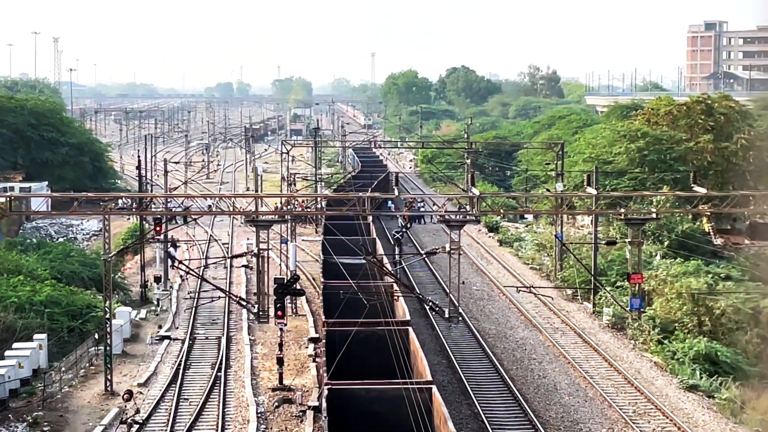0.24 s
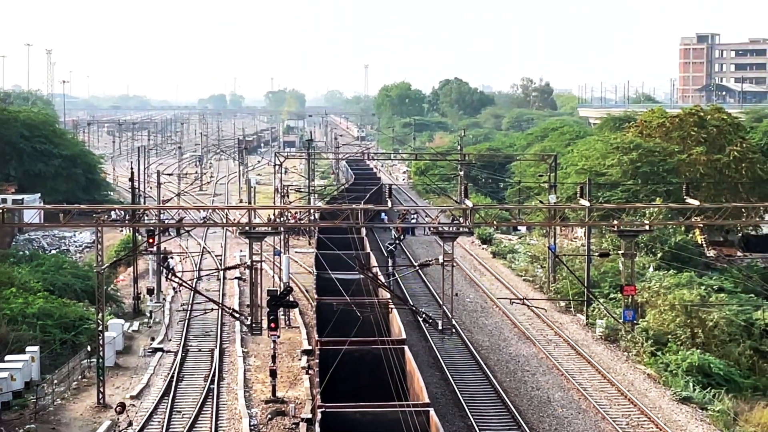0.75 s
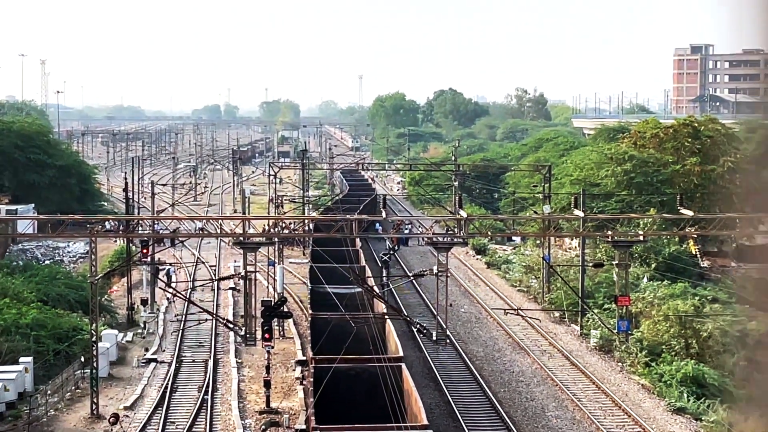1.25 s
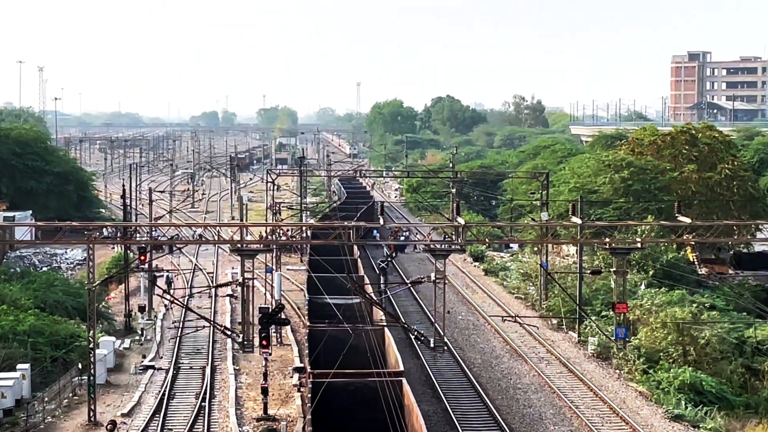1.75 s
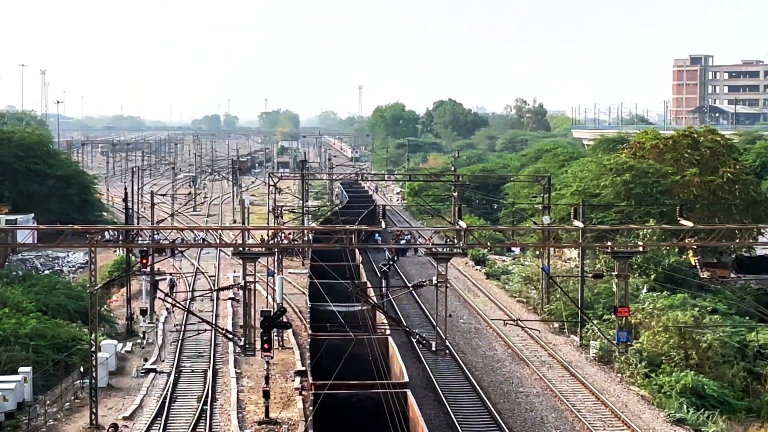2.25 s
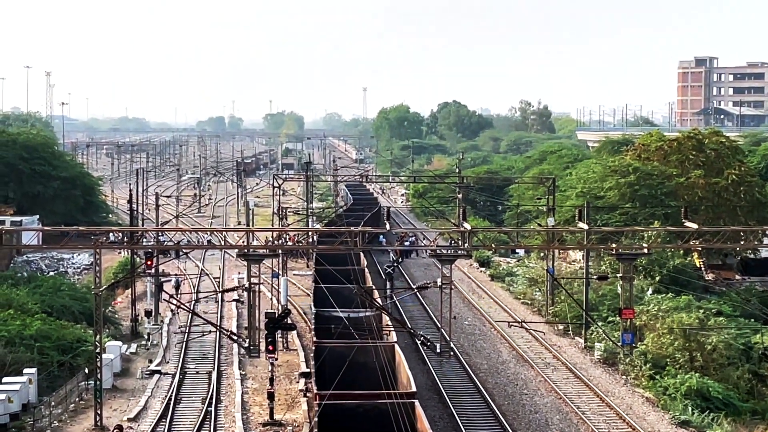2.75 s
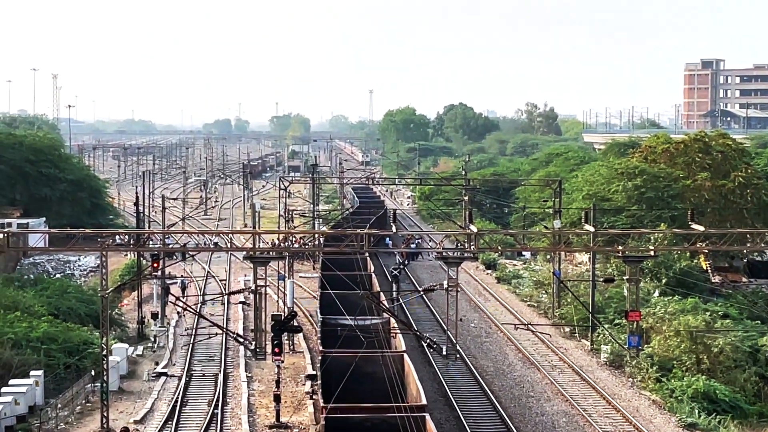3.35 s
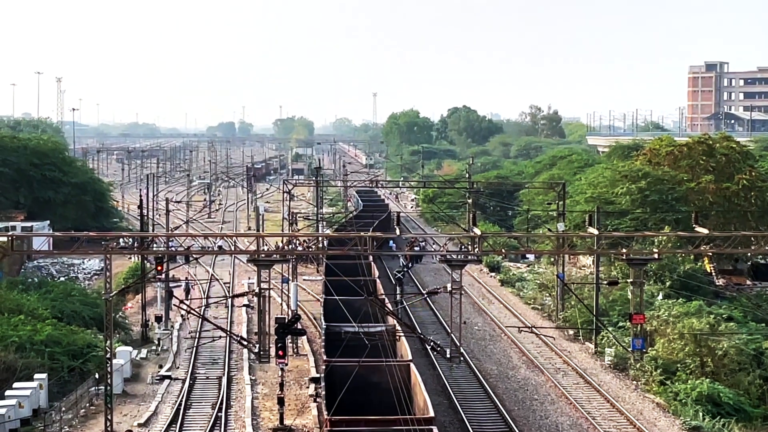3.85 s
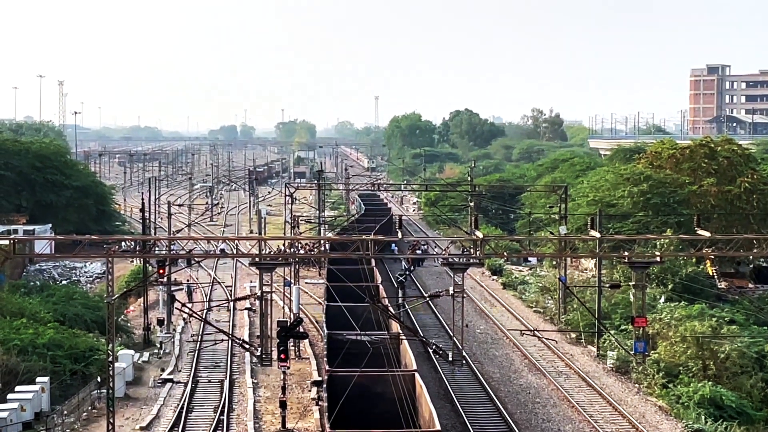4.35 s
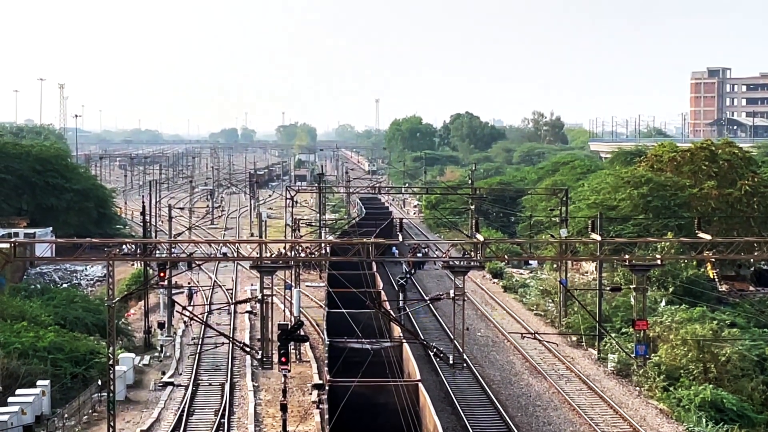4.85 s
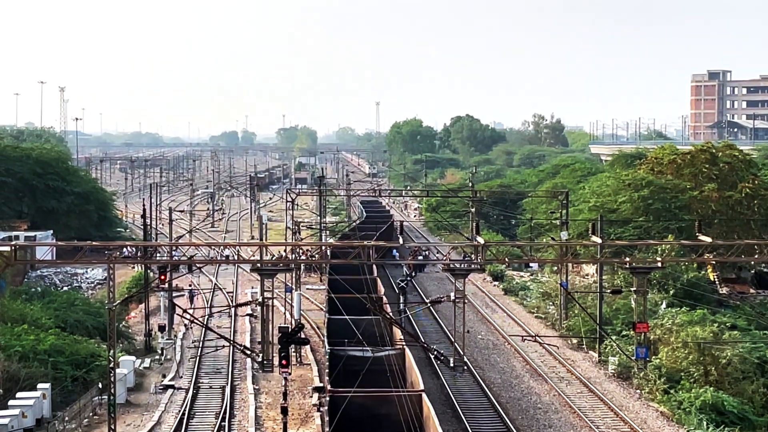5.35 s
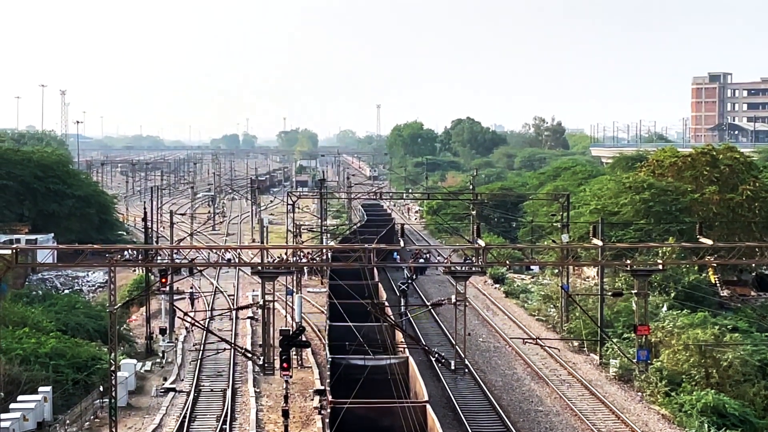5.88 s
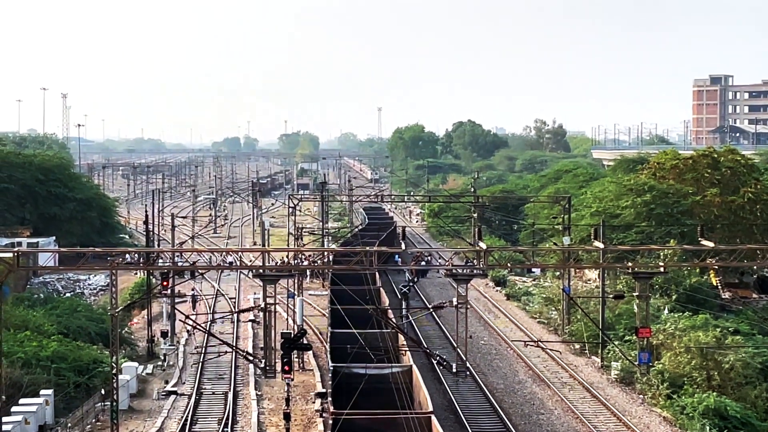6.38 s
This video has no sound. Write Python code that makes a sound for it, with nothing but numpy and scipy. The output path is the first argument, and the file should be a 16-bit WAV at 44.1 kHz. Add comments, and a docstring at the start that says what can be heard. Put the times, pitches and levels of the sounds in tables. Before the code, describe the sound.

Gusts thump and flutter against an exposed microphone, partly covering a freight train passing below. Metal wheels grind in uneven swells, with dull body thuds and short clanks. The hardest wind blast comes around two and a half seconds. Just after three, a far horn toots twice, quick and soft with a slight yard echo. Lighter wind follows, leaving clearer rolling, brief high squeaks, a sharp clank near the end and final low knocks.

```python
"""From the start a long train of open freight wagons rolls under a footbridge in a rail yard: shaped noise
makes its drone, roar and hiss, louder in each rub of wheel on rail; clanks, knocks and squeaks are short rings,
noise bursts and gliding tones. Gusty noise and falling chirps make wind rumble and pop on the microphone, hardest
in the first three seconds. Just after three seconds a distant horn, a stack of sine waves, toots twice.
Then the wind is weaker while the wheels go on grinding, squeaking and clanking to the end."""
import sys
import numpy as np
from scipy import signal
from scipy.fft import rfft, irfft
from scipy.io import wavfile
from scipy.ndimage import uniform_filter1d, minimum_filter1d

SR = 44100
rng = np.random.default_rng(int(sys.argv[2]) if len(sys.argv) > 2 else 0)


def store_pcm(level_fs):
    """Save levels as 16-bit WAV."""
    pcm = np.round(np.clip(level_fs, -1, 1) * 32767).astype(np.int16)
    wavfile.write(sys.argv[1], SR, np.atleast_2d(pcm).T)


N = 291942
TIME = np.arange(N) / SR
FREQS = np.fft.rfftfreq(N, 1 / SR)

# Pairs of signals are (mid, side): what left and right share, and half their difference.
# Levels in the tables are starting points; the *_db trims in the functions then shift whole layers.


def amp(db):
    """Turns decibels into a plain gain."""
    return 10 ** (np.asarray(db) / 20)


def unit(x):
    """Scales a sound to an average (rms) level of 1."""
    return x / np.sqrt(np.mean(x ** 2) + 1e-20)


def colour(points, hz, rolloff_db=18):
    """Gain of a spectrum, joined on a log-frequency axis; past its top it falls by rolloff_db an octave."""
    f, db = np.transpose(points)
    octaves = np.log2(hz + 1)
    past_top = np.maximum(octaves - np.log2(f[-1]), 0)
    return amp(np.interp(octaves, np.log2(f), db) - rolloff_db * past_top)


def levels(rows):
    """Gain over time for each level column of a table."""
    s, *columns = np.transpose(rows)
    return [amp(np.interp(TIME, s, c)) for c in columns]


def add(mix, s, sound):
    """Mixes a sound in at time s."""
    part = mix[..., max(round(s * SR), 0):][..., :sound.shape[-1]]
    part += sound[..., :part.shape[-1]]


def wander(rate_hz):
    """Random drift of rms 1, made of noise kept below roughly rate_hz."""
    return unit(irfft(rfft(rng.standard_normal(N)) * np.exp(-(FREQS / rate_hz) ** 2), N))


def white_pair():
    """White noise, separate for mid and side."""
    return rng.standard_normal((2, N))


def tinted(pair, spectrum, width):
    """Colours a mid and side pair and sets its width; the mid gets rms 1."""
    z = rfft(pair) * colour(spectrum, FREQS)
    mid = irfft(z[0], N)
    side = irfft(z[1] * colour(width, FREQS), N)
    return np.array([mid, side]) / mid.std()


def pop(hz, spread, sweep=1.7):
    """One eddy, a small whirl of air: a short chirp that falls in pitch, strongest as it passes hz."""
    age = np.arange(1, 2400) / SR + sweep / 4000  # the pitch starts near 4000 Hz
    pitch = sweep / age
    shape = np.exp(-.5 * (np.log(pitch / hz) / spread) ** 2)
    shape = shape * signal.windows.tukey(len(age), .01)
    return shape * np.sin(2 * np.pi * (sweep * np.log(age) + rng.random()))


def flutter(per_s, hz, uneven_db, spread=0.41):
    """A random patter of small eddies at three pitches, mid and side."""
    out = np.zeros((2, N))
    for pitch in hz * 2 ** np.linspace(-.5, .5, 3):
        size = amp(uneven_db * np.minimum(rng.exponential(1, (2, N)), 3))
        size = size * rng.choice([-1, 1], (2, N))
        hits = size * (rng.random((2, N)) < per_s / SR)
        eddy = pop(pitch, sweep=1.4, spread=spread)
        out += signal.oaconvolve(hits, eddy[None], axes=1)[:, :N]
    return unit(out)


# short toots of the far horn: (start [s], length [s], level [dB], overtones [dB])
HORN_TOOTS = [(3.1, .225, -18.8, 4), (3.345, .15, -21.5, -5)]
# overtones of the horn: (multiple of its pitch, level [dB])
HORN_OVERTONES = [(2, -15), (3, -18), (4, -23), (5, -32)]
HORN_RISE_S, HORN_FALL_S = 0.025, 0.021
HORN_HZ, HORN_BEND_HZ = 365, 25.52  # pitch mid-toot; it starts and ends this much sharper
HORN_DULLING_DB_PER_S = 55  # how fast the overtones fade within a toot
HORN_ROUGH = .019  # wavering of the pitch, as a fraction


def horn(fading_db=3):
    """A far horn: its pitch dips mid-toot and wavers; its overtones come and go on the way through the wind."""
    out = np.zeros(N)
    for start, length, db, bright_db in HORN_TOOTS:
        age = np.clip(TIME - start, 0, length)
        bend = HORN_BEND_HZ * (2 * age / length - 1) ** 4
        hz = (HORN_HZ + bend) * (1 + HORN_ROUGH * wander(rate_hz=75))
        phase = 2 * np.pi * np.cumsum(hz) / SR
        overtones = np.zeros(N)
        for k, k_db in HORN_OVERTONES:
            fading = amp(k_db + fading_db * wander(rate_hz=20))
            overtones += fading * np.sin(round(k) * phase)
        brightness = amp(bright_db - HORN_DULLING_DB_PER_S * age)
        blast = np.minimum(age / HORN_RISE_S, 1) * np.minimum((length - age) / HORN_FALL_S, 1)
        out += amp(db) * blast * (np.sin(phase) + brightness * overtones)
    return np.sqrt(2) * out * unit(amp(2.6 * wander(rate_hz=45)))


def yard(x, echo_db=-6, t60=0.082, side_db=-2):
    """Wagons and buildings scatter a far sound into a short diffuse echo: mid and side."""
    t = np.arange(SR // 2) / SR
    tail = rng.standard_normal((2, len(t))) * amp(-60 * t / t60) * (t > .015)
    tail /= np.linalg.norm(tail, axis=1, keepdims=True)
    mid, side = amp(echo_db) * signal.oaconvolve(x[None], tail, axes=1)[:, :N]
    return np.array([x + mid, amp(side_db) * side])


def steadied(pair):
    """Evens out the slow swells of a noise, so that the wind's own ups and downs set its level."""
    return pair / np.sqrt(uniform_filter1d(pair[0] ** 2, size=3000) + 1e-9)


# strength of the wind, dropping suddenly after the strongest gust: (time [s], rumble [dB], buffeting [dB])
WIND_STRENGTH = [(0, -11.5, -25.5), (.3, -17.5, -21.5), (.48, -11, -20), (1.0, -15.5, -25),
                 (1.3, -14.5, -27), (1.45, -16, -22), (1.73, -18.5, -29.5), (1.95, -13, -21),
                 (2.22, -19.5, -22.5), (2.4, -11, -15), (2.64, -13, -21), (2.71, -19, -30),
                 (3.4, -23.5, -26), (4.55, -21, -26.5), (5.3, -21, -33), (5.7, -18, -29.5),
                 (6.2, -21, -27.5), (6.62, -23.5, -29)]
# single gusts: (middle [s], rumble [dB], buffeting [dB])
SINGLE_GUSTS = [(.05, -21, -24), (0.861, -8.5, -26), (1.16, -17, -25.5), (1.5, -12, -27), (1.61, -11, -21),
                (2.49, -13.5, -32), (2.62, -10, -30), (3.03, -20.5, -40), (3.6, -18.5, -18),
                (4.14, -18.5, -33), (4.39, -14, -40), (4.59, -32, -23), (4.9, -26, -31), (5.69, -17.5, -25),
                (5.8, -33, -41), (5.95, -20, -46)]
GUST_S = 0.058  # length of each, between the points where it is at 1/e of its height
# tone of the deep rumble: (frequency [Hz], level per Hz [dB])
RUMBLE_TONE = [(18, -35), (30, -14.5), (45, -3), (72, 2.5), (100, -4), (150, -12.5), (250, -28.5),
               (500, -51)]
# tone of the buffeting: (frequency [Hz], level per Hz [dB])
BUFFET_TONE = [(35, -38), (80, -19), (130, 4), (200, 0.5), (300, -1), (420, -10), (700, -21), (1500, -59)]
# how wide the wind sounds: (frequency [Hz], side minus mid [dB])
WIND_SPREAD = [(25, -30), (45, -8), (65, -19.5), (95, -8), (150, -4), (230, -6), (400, -26)]
# eddies popping on the microphone: (time [s], level [dB], strongest pitch [Hz], breadth [natural-log pitch])
WIND_POPS = [(1.435, -11, 197, 0.62), (1.511, -13, 180, .5), (1.984, -11, 405, .5), (2.218, -15, 360, 0.36),
             (2.3025, 2.5, 310, 0.6), (2.325, -13, 330, 0.38), (2.356, -3, 398, 0.26),
             (2.389, -12, 430, 0.33), (2.394, -7, 520, .3), (2.411, -0.5, 420, 0.37), (2.454, -1, 420, .5),
             (2.473, -10, 299, 0.72), (2.513, -15, 520, .4), (2.533, -7, 370, 0.45), (2.563, -7, 160, 0.75),
             (3.285, -15, 543, 0.36), (3.369, -11.5, 294, .5), (3.765, -12, 380, 0.6),
             (3.822, -12, 346, 0.6), (3.961, -11, 294, 0.59), (4.258, -11.5, 330, 0.58),
             (4.368, -11.5, 340, 0.59), (4.473, -11.5, 536, 0.29), (4.644, -10, 566, 0.65),
             (4.747, -16, 180, 0.38), (5.257, -11, 670, 0.29), (6.23, -9.5, 275, 0.31)]
TURBULENCE_DB, TURBULENCE_HZ = 2, 22  # random unsteadiness of the wind


def wind(rumble_db=0.0, buffet_db=0.0, pops_db=-1, pop_side=0.22, eddies_db=-9):
    """Rumble, buffeting and pattering eddies swell in gusts; single pops hit the two microphone ports unequally."""
    gust, buffet = levels(WIND_STRENGTH)
    for s, low_db, mid_db in SINGLE_GUSTS:
        puff = np.exp(-(2 * (TIME - s) / GUST_S) ** 2)
        gust = np.hypot(gust, amp(low_db) * puff)
        buffet = np.hypot(buffet, amp(mid_db) * puff)
    out = amp(rumble_db) * gust * steadied(tinted(white_pair(), RUMBLE_TONE, WIND_SPREAD))
    out += amp(buffet_db) * buffet * steadied(tinted(white_pair(), BUFFET_TONE, WIND_SPREAD))
    patter = flutter(per_s=14, hz=202, uneven_db=1.0) * np.array([[1], [.4]])
    out += amp(eddies_db) * buffet * patter
    out *= amp(TURBULENCE_DB * wander(TURBULENCE_HZ))
    for s, db, hz, breadth in WIND_POPS:
        pair = np.array([pop(hz, spread=breadth), pop_side * pop(hz, spread=breadth)])
        add(out, s - .001, amp(db + pops_db) * pair)
    return out


# dense flurries of eddies: (start [s], length [s], level [dB])
EDDY_FLURRIES = [(2.195, 0.039, -25), (2.311, 0.022, -22), (2.352, 0.064, -16.5), (2.424, 0.018, -15.5),
                 (2.457, 0.018, -25), (2.526, .025, -19.5), (3.162, 0.04, -20), (3.272, .045, -22),
                 (3.519, 0.082, -20.5), (4.066, 0.082, -24.5), (4.514, 0.17, -27), (4.892, 0.041, -22)]


def flurries(flurry_db=0.0, hz=410, side=0.18):
    """Eddies crowd so closely that they merge into a rough splutter."""
    level = np.zeros(N)
    for s, length, db in EDDY_FLURRIES:
        add(level, s, amp(db) * signal.windows.tukey(int(length * SR), .5))
    splutter = flutter(per_s=170, hz=hz, uneven_db=1.0, spread=0.36)
    return amp(flurry_db) * level * splutter * np.array([[1], [side]])


# short knocks and ticks: (time [s], starting level [dB], middle of the band [Hz], time to fall by 60 dB [s])
KNOCKS = [(1.089, -24.5, 720, 0.12), (1.857, -18, 700, 0.07), (1.864, -31, 2290, 0.12),
          (2.303, -24, 1770, 0.015), (4.762, -31, 2120, 0.11), (4.775, -36.5, 4070, 0.25),
          (5.37, -33, 9500, 0.017), (5.529, -18.5, 605, 0.11), (6.497, -25, 1790, 0.17),
          (6.505, -22, 365, 0.67)]


def ticks(spread=0.16):
    """Brief bursts of noise, each in one band."""
    out = np.zeros(N)
    for s, db, hz, t60 in KNOCKS:
        band = np.exp(-.5 * (np.log((FREQS + 1) / hz) / spread) ** 2)
        burst = unit(irfft(rfft(rng.standard_normal(N)) * band, N))
        add(out, s, burst * amp(db - 60 * TIME / t60))
    return out


# wheel rims and brake rods squeaking: (start [s], length [s], pitch [Hz], level [dB], glide [Hz])
STEEL_SQUEAKS = [(.01, .13, 1805, -41, 0), (1.11, .13, 5534, -50, 0), (1.22, .26, 2885, -43.5, -35),
                 (1.33, .06, 2275, -41.5, 0), (1.51, .08, 9539, -54, 0), (1.585, .05, 3704, -44.5, 0),
                 (1.85, .06, 9173, -53, 0), (2.67, .14, 3575, -47, 0), (4.28, .13, 9310, -54, 0),
                 (4.78, .09, 2555, -40.3, 10), (4.805, .05, 4005, -45.5, 30), (4.81, .045, 4430, -48, 0),
                 (4.92, .13, 6550, -55, -30), (5.315, .14, 4974, -44.5, 0), (5.59, .04, 5400, -47, 0),
                 (5.605, .05, 3020, -40, -20), (5.61, .055, 2557, -41, 0), (5.665, .04, 2794, -41, -60),
                 (5.67, .05, 3020, -42.5, 70), (5.69, .035, 3600, -46, 0), (5.776, .025, 1890, -31, 40),
                 (5.812, .035, 1760, -32.5, -110), (6.27, .06, 820, -36, 80), (6.35, .17, 815, -33.5, 85),
                 (6.31, .1, 9496, -56, 0), (6.33, .13, 3639, -44, 0)]


def squeaks():
    """Rubbing steel sings on one note, swelling, gliding and fading, unsteady as it sticks and slips."""
    out = np.zeros(N)
    for s, length, hz, db, glide_hz in STEEL_SQUEAKS:
        n = int(length * SR)
        along = np.arange(n) / n
        pitch = (hz + glide_hz * along) * (1 + .0021 * wander(rate_hz=110)[:n])
        tone = np.sin(2 * np.pi * np.cumsum(pitch) / SR)
        add(out, s, amp(db) * unit(tone) * np.sqrt(np.sin(np.pi * along)))
    return out * amp(1.8 * wander(rate_hz=90))


# tone of the wagon bodies: (frequency [Hz], level per Hz [dB])
BODY_TONE = [(40, -37), (150, -11.5), (280, 3.5), (420, 4), (600, -3), (850, -3.5), (1200, -11),
             (2500, -48)]
# how wide the train sounds: (frequency [Hz], side minus mid [dB])
TRAIN_SPREAD = [(100, 17.5), (260, 4), (450, -3.5), (1100, -8), (1600, -4.5), (1900, -3.5), (2300, -11.5),
                (3100, -23), (3600, -79), (6100, -58), (6500, -7), (10200, -32), (11300, -26), (13000, -10),
                (14500, -11)]
# wheels striking rail joints: (time [s], level [dB], time to fall by 60 dB [s], thud of the wagon body [dB])
JOINT_CLANKS = [(.068, -25, 0.32, -46), (.389, -25.5, 0.55, -17), (1.087, -19.5, .22, -17),
                (1.527, -21.5, 0.18, -42), (1.856, -23, 0.19, -25), (2.076, -19.5, 0.21, -14.5),
                (2.126, -17.5, 0.21, -32), (2.514, -23.5, 0.35, -21), (3.05, -29, 0.39, -46),
                (4.043, -29, .26, -31), (4.15, -40, 0.24, -40), (4.478, -44, .27, -37),
                (4.762, -20.5, 0.36, -47), (5.53, -23.5, 0.29, -36), (5.781, -13, 0.069, -38),
                (5.812, -34, 0.15, -38), (6.208, -23, 0.85, -22), (6.498, -26, 0.25, -13)]
# tone of the clanking wheel: (frequency [Hz], level per Hz [dB])
CLANK_TONE = [(40, -38), (120, 13.5), (300, 3.5), (800, 4.5), (1300, -2), (1900, 4), (3000, -7), (5000, -9),
              (7000, -17), (11000, -25), (14000, -38)]
THUD_T60_S = 0.17  # a thud falls by 60 dB in this time


def clanks(clank_db=-6, rise_s=0.0051, thud_db=-4):
    """Each joint shakes the wheel into a dense, quickly dying ring and the wagon body into a thud."""
    shake, thud = np.zeros(N), np.zeros(N)
    t = np.arange(SR) / SR
    attack = 1 - np.exp(-t / rise_s)
    for s, db, t60, body_db in JOINT_CLANKS:
        add(shake, s, amp(db - 60 * t / t60) * attack)
        add(thud, s, amp(body_db - 60 * t / THUD_T60_S) * attack)
    ring = amp(clank_db) * shake * tinted(ringing(patchy_db=1.0), CLANK_TONE, TRAIN_SPREAD)
    return ring + amp(thud_db) * thud * tinted(white_pair(), BODY_TONE, TRAIN_SPREAD)


def ringing(patchy_db):
    """Noise in which narrow steel resonances swell and fade at random."""
    z = signal.stft(white_pair(), nperseg=1024, noverlap=768)[2]
    patches = rng.standard_normal(z.shape[1:])
    patches = uniform_filter1d(patches, size=22, axis=1)  # slow in time
    patches = unit(uniform_filter1d(patches, size=2, axis=0))  # narrow in pitch
    return signal.istft(z * amp(patchy_db * patches), nperseg=1024, noverlap=768)[1][:, :N]


RUB_ATTACK_S, RUB_RELEASE_S = 0.042, 0.1  # full rise; fall to 1/e


def swell(start, length):
    """Rise and fall of one rub: it builds up, then dies away once its length is over."""
    age = TIME - start
    rise = np.clip(age / RUB_ATTACK_S, 0, 1)
    return rise * np.exp(-np.maximum(age - length, 0) / RUB_RELEASE_S)


# wheels grinding along the rail as they pass: (start [s], length [s], roar [dB], hiss [dB], sizzle [dB])
WHEEL_RUBS = [(0.013, 0.14, -39, -45, -49), (0.4, 0.17, -35.5, -42, -47), (0.612, 0.13, -35.5, -45, -47),
              (0.786, 0.3, -40, -44, -45.5), (1.077, 0.083, -37.5, -38, -49), (1.28, 0.08, -55, -50, -55),
              (1.478, 0.077, -46, -43, -41.5), (1.849, 0.1, -40.5, -39.5, -45),
              (2.084, 0.054, -33, -39.5, -42.5), (2.527, 0.11, -33, -41.5, -42),
              (2.7, 0.12, -31, -43.5, -49), (3.034, 0.039, -39.5, -38.5, -42.5),
              (3.319, 0.099, -32, -41, -50), (3.507, 0.11, -32.5, -41.5, -45),
              (3.717, 0.042, -33.5, -36.5, -41), (4, 0.23, -32, -43, -50),
              (4.109, 0.048, -33.5, -32.5, -34.5), (4.237, 0.05, -45, -44, -44),
              (4.438, 0.1, -39, -43, -46), (4.767, 0.07, -42, -40, -47), (4.88, 0.1, -37.5, -50, -46.5),
              (5.095, 0.18, -38, -43.5, -50), (5.499, 0.16, -31.5, -39, -43.5),
              (5.767, 0.065, -30.5, -35, -35.5), (5.918, 0.038, -35.5, -39.5, -49),
              (6.23, 0.19, -34.5, -40, -43.5), (6.453, 0.053, -29.5, -39, -46)]
GRIT_PER_S, GRIT_T60_S = 260, .06  # tiny impacts a second; time for each to fall by 60 dB
GRIT_DB = -7  # relative to the roar of each rub
GRIT_LOW_HZ, GRIT_HIGH_HZ = 1350, 3100


def grit():
    """Grinding wheels chatter: tiny impacts ring the steel, each on its own pitch, heard during each rub."""
    out = np.zeros(N)
    t = np.arange(SR // 8) / SR
    for when, pitch, size in rng.random((round(GRIT_PER_S * N / SR), 3)):
        hz = GRIT_LOW_HZ * (GRIT_HIGH_HZ / GRIT_LOW_HZ) ** pitch
        ring = np.sin(2 * np.pi * hz * t) * amp(-60 * t / GRIT_T60_S)
        add(out, when * N / SR, size ** 2 * np.sqrt(GRIT_LOW_HZ / hz) * ring)
    power = sum((amp(db) * swell(start, length)) ** 2 for start, length, db, *_ in WHEEL_RUBS)
    return amp(GRIT_DB) * np.sqrt(power) * unit(out)


# steady rolling: level at the start [dB] and its change [dB per s]
DRONE_DB, DRONE_DB_PER_S = -34.5, 0.9
ROAR_DB, ROAR_DB_PER_S = -36.5, 0.1044
HISS_DB, HISS_DB_PER_S = -50.5, -0.07
SIZZLE_DB = -56  # changes along with the hiss
RUB_SHAKE_DB = 3.5  # drone of the wagon body, relative to the roar of the rub that shakes it


def wheel_levels(jolt_db=0.87, jolt_hz=16):
    """Gains of drone, roar, hiss and sizzle: steady rolling plus each rub, jolted by the uneven track."""
    power = sum((amp(dbs)[:, None] * swell(start, length)) ** 2 for start, length, *dbs in WHEEL_RUBS)
    roar, steel, sizzle = np.sqrt(power)
    gains = [np.hypot(amp(DRONE_DB + DRONE_DB_PER_S * TIME), amp(RUB_SHAKE_DB) * roar),
             np.hypot(amp(ROAR_DB + ROAR_DB_PER_S * TIME), roar),
             np.hypot(amp(HISS_DB + HISS_DB_PER_S * TIME), steel),
             np.hypot(amp(SIZZLE_DB + HISS_DB_PER_S * TIME), sizzle)]
    return np.array(gains) * amp(jolt_db * wander(jolt_hz))


# tone of the wheel roar: (frequency [Hz], level per Hz [dB])
ROAR_TONE = [(60, -36), (200, -33), (500, -3.5), (850, 0.5), (1250, -3.5), (1700, -2), (2100, -6.5),
             (2800, -6.5), (4000, -12.5), (5500, -18.5), (8000, -71)]
# tone of the steel hiss: (frequency [Hz], level per Hz [dB])
HISS_TONE = [(2000, -46), (3600, -1), (5000, -0.5), (6500, -2), (7500, -7), (9500, -10), (11500, -35),
             (13500, -22)]
# tone of the sizzle, the highest part of the rolling: (frequency [Hz], level per Hz [dB])
SIZZLE_TONE = [(5000, -34), (7500, -5), (9500, 9), (11500, 7), (13500, -5), (15500, -9)]


def rolling(body_db=-2, flutter_db=-5, flutter_side=0.5, roar_db=-0.34, hiss_db=-1, sizzle_db=-11):
    """Wagon bodies drone, wheels roar and hiss; moving air roughens the low middle."""
    body, roar, steel, sizzle = wheel_levels()
    low = amp(body_db) * tinted(white_pair(), BODY_TONE, TRAIN_SPREAD)
    moving_air = flutter(per_s=55, hz=528, uneven_db=2.0) * np.array([[1], [flutter_side]])
    low += amp(flutter_db) * moving_air
    high = amp(roar_db) * roar * tinted(ringing(patchy_db=2.5), ROAR_TONE, TRAIN_SPREAD)
    high += amp(hiss_db) * steel * tinted(ringing(patchy_db=4.0), HISS_TONE, TRAIN_SPREAD)
    high += amp(sizzle_db) * sizzle * tinted(ringing(patchy_db=4.5), SIZZLE_TONE, TRAIN_SPREAD)
    return body * low + high


def scene():
    """Horn, wind and train as mid and side, turned into left and right."""
    mid, side = yard(horn()) + wind() + flurries() + clanks() + rolling()
    mid = mid + ticks() + squeaks() + grit()
    return np.array([mid + side, mid - side])


LIMIT_DB = -6.5  # sound above this level is turned down
HOLD_S, RELEASE_S = .18, .035  # wait before letting go; fall of the turn-down to 1/e


def ducked(pair):
    """Gain control: a loud blast quickly turns everything down; the gain is held, then let back up."""
    power = abs(uniform_filter1d((pair ** 2).mean(0), size=400))
    power_db = 10 * np.log10(power + 1e-12)
    hold = round(HOLD_S * SR)
    gain_db = np.minimum(LIMIT_DB - power_db, 0)
    held_db = -minimum_filter1d(gain_db, size=hold, origin=(hold - 1) // 2, mode="constant")
    fade = np.exp(-TIME / RELEASE_S)
    over_db = np.maximum.accumulate(held_db / fade) * fade
    return pair * amp(-signal.lfilter(np.ones(400) / 400, 1, over_db))


# the two microphone ports drift apart in phase in the treble: (frequency [Hz], lead of the left [radians])
PORT_LEAD = [(1700, 0), (1900, 1.3), (2150, 0), (6200, 0), (6400, .6), (7000, 1), (7600, 2.1), (8000, 3.05),
             (8600, 3.25), (8900, 3.5), (9200, 4.2), (10000, 4.9), (11000, 6.28), (12200, 6.28),
             (13000, 7.4), (14100, 9.42)]
EDGE_HZ = 15750  # little is left above this


def record(dry):
    """The ports differ in phase and cancel in the sum where they oppose; gain control, rounded peaks, treble cut."""
    mid, side = rfft(dry.mean(0)), rfft((dry[0] - dry[1]) / 2)
    half = np.interp(FREQS, *np.transpose(PORT_LEAD)) / 2
    turned_side = side + 1j * mid * np.sin(half)
    mid, side = irfft(mid * np.cos(half), N), irfft(turned_side, N)
    pair = ducked(np.array([mid + side, mid - side]))
    pair = pair / (1 + pair ** 8) ** (1 / 8)  # rounds off peaks near full scale
    treble_cut = signal.firwin(511, EDGE_HZ, window=("kaiser", 9), fs=SR)
    return signal.oaconvolve(pair, treble_cut[None], "same")


dry = scene()
out = record(dry)
store_pcm(out)
```